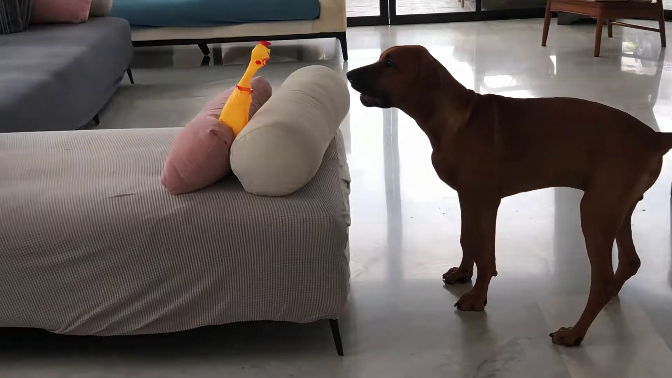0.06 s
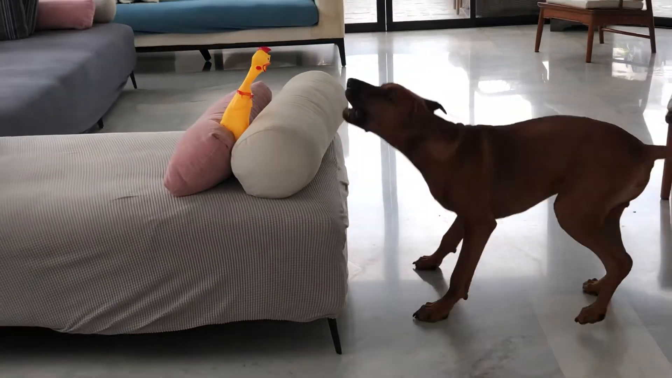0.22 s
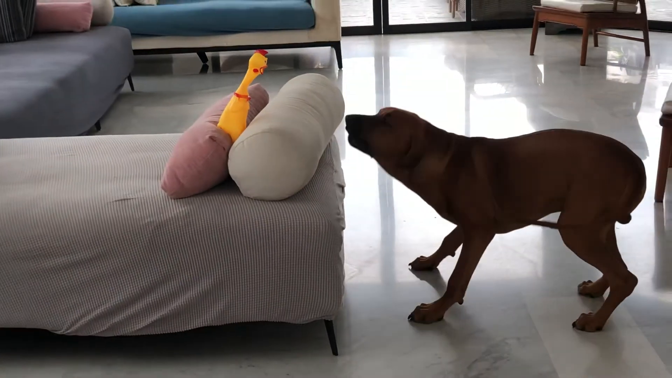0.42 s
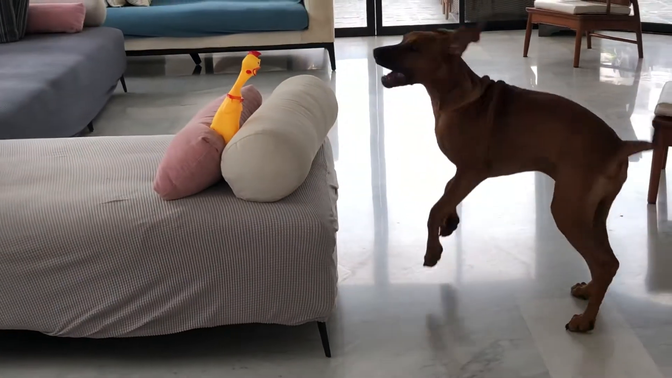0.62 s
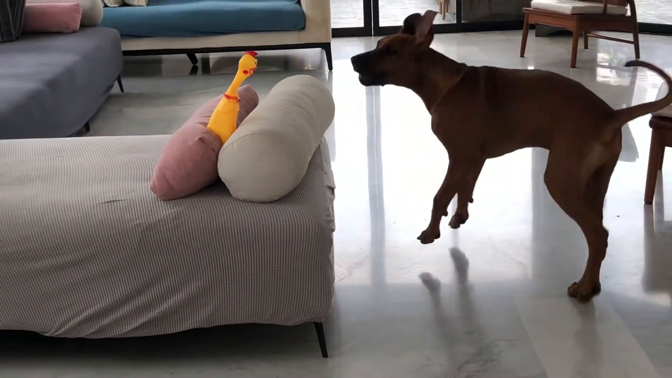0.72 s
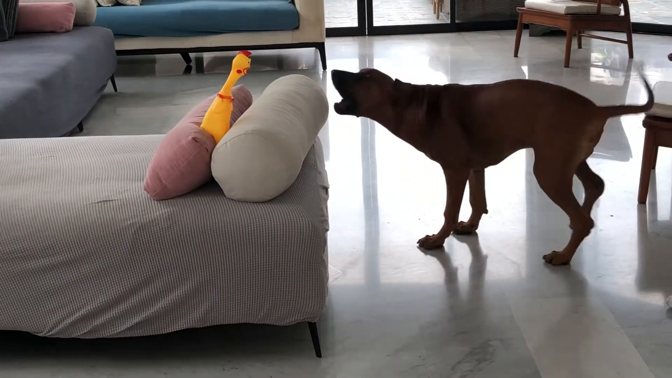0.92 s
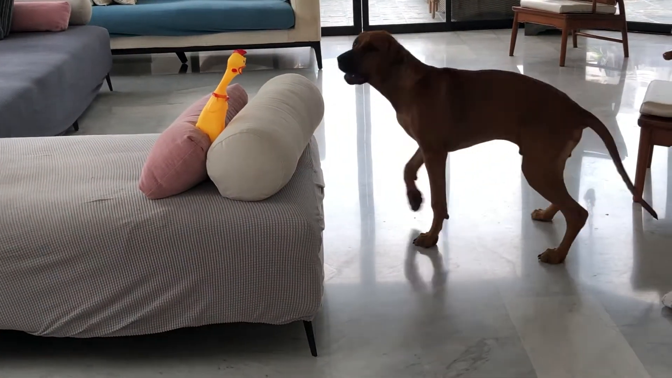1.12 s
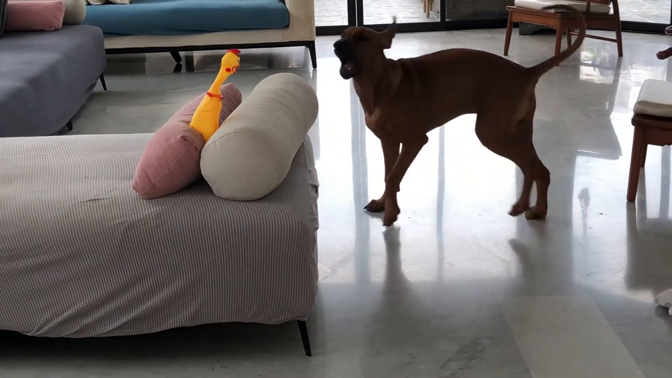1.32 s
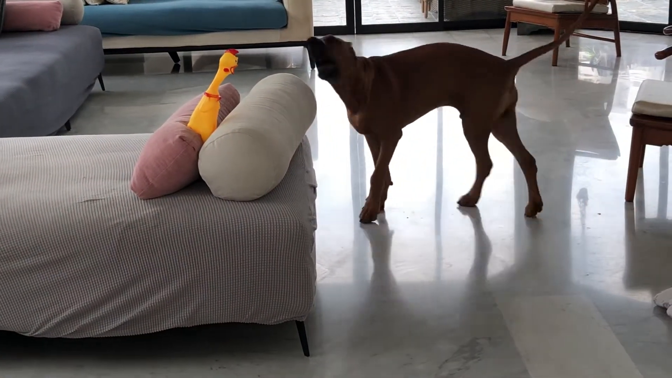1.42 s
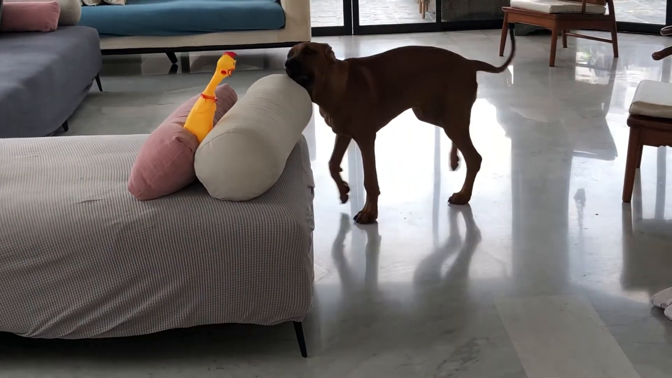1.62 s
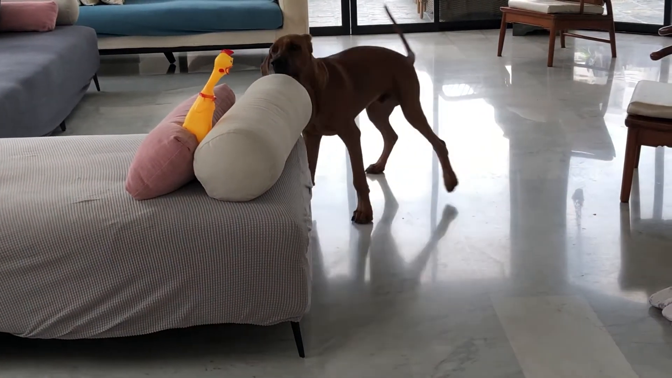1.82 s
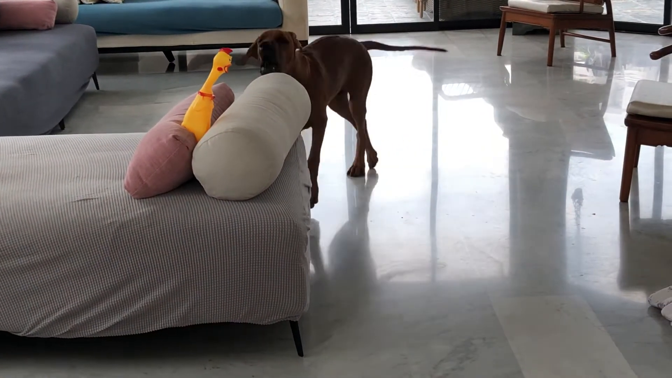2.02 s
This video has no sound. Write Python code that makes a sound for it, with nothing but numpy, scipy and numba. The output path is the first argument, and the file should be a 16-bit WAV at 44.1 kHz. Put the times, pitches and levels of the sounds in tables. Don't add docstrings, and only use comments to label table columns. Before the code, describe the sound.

Low, quiet room hum and tiny claw ticks on a stone floor at 0.15 s, then a large dog barks loudly at 0.2, 0.85 and 1.4 s. Each bark lasts about 0.2 s, hoarse and breathy, rising in pitch, the last rougher and more broken. Faint claws tick between them and soft paws thud near 1.0 and 1.55 s. The hard living room rings about a second; the phone compresses the peaks.

```python
import sys
import numpy as np
from scipy import signal
from scipy.fft import rfft, irfft, next_fast_len
from scipy.io import wavfile
from scipy.ndimage import map_coordinates
from numba import njit

SR = 44100
rng = np.random.default_rng(int(sys.argv[2]) if len(sys.argv) > 2 else 0)


def store_pcm(level_fs):
    pcm = np.round(np.clip(level_fs, -1, 1) * 32767).astype(np.int16)
    wavfile.write(sys.argv[1], SR, np.atleast_2d(pcm).T)


def convert_level_to_amplitude(level_db):
    exponent = np.asarray(level_db, float) / 20
    return 10 ** exponent


N = 90405


def level(x, db):
    return x * convert_level_to_amplitude(db) / np.sqrt(np.mean(x ** 2))


@njit
def svf(x, hz, width_hz):
    y, band_state, low_state = np.empty(len(x)), 0., 0.
    for i in range(len(x)):
        g, k = np.tan(np.pi * hz[i] / SR), width_hz / hz[i]
        v = (band_state + g * (x[i] - low_state)) / (1 + g * (g + k))
        band_state = 2 * v - band_state
        low_state += 2 * g * v
        y[i] = k * v
    return y


@njit
def follow(x, rise, fall):
    y, e = np.empty(len(x)), 1e-4
    for i in range(len(x)):
        e += (x[i] - e) * (rise if x[i] > e else fall)
        y[i] = e
    return y


def resonate(x, hz, width_hz):
    hz = hz + np.zeros(len(x))
    once = svf(x, hz, 1. * width_hz)
    return svf(once, hz, 1. * width_hz)


def wobble(n, rate_hz):
    w = map_coordinates(rng.standard_normal(n), [np.arange(n) * rate_hz / SR], order=1)
    return w / w.std()


def coloured_octaves(n, points):
    f = np.maximum(np.fft.rfftfreq(n, 1 / SR), 1)
    point_hz, point_db = np.array(points).T
    spectrum = rfft(rng.standard_normal(n)) * convert_level_to_amplitude(np.interp(np.log(f), np.log(point_hz), point_db))
    octaves = []
    for centre in 32 * 2. ** np.arange(10):
        weight = np.clip(1 - np.abs(np.log2(f / centre)), 0, 1)
        octaves.append((centre, irfft(spectrum * weight, n)))
    return octaves


# (frequency [Hz], density [dB per Hz])
HUM_SPECTRUM = [(30, -35.5), (70, -10), (190, -7.5), (300, -9), (700, -16.5), (2000, -26), (5000, -37),
                (14000, -63)]
HUM_DB, HUM_FLICKER_DB, HUM_FADE_DB_S = -43.5, 2, 1.5


def air():
    octaves = coloured_octaves(next_fast_len(N), HUM_SPECTRUM)
    hum = sum(convert_level_to_amplitude(HUM_FLICKER_DB * wobble(N, 6.3)) * b[:N] for _, b in octaves)
    return level(hum, HUM_DB) * convert_level_to_amplitude(-HUM_FADE_DB_S * np.arange(N) / SR)


# (frequency [Hz], T60 [s])
ROOM_T60 = [(125, 0.44), (400, 0.69), (1000, 0.82), (2500, 0.89), (6000, 0.74), (14000, 0.36)]
# (frequency [Hz], density [dB per Hz])
ROOM_COLOUR = [(100, 1.5), (400, 7.5), (1000, 1), (3000, -3), (8000, 2), (16000, 1.5)]
# (frequency [Hz], T60 [s], level at bark 1 [dB], bark 2 [dB], bark 3 [dB])
ROOM_RINGS = [(357, .9, -7, -14, -14), (430, 1.15, -1, -7, -8), (512, 1., -16, -8, -8),
              (720, .9, -9, -12, -10), (791, 1.6, -18, -14, 0), (836, 1.2, -16, -3, -10)]
ROOM_DB, RINGS_DB = 0, -17
FIRST_ECHO_S, BUILD_S = 0.0032, 0.007
ROOM_LEN = 65536


def room(x, spot):
    t = np.arange(ROOM_LEN) / SR
    t60_hz, t60_s = np.array(ROOM_T60).T
    tail = np.zeros(ROOM_LEN)
    for hz, b in coloured_octaves(ROOM_LEN, ROOM_COLOUR):
        tail += b * convert_level_to_amplitude(-60 * t / np.interp(np.log(hz), np.log(t60_hz), t60_s))
    rings = np.zeros(ROOM_LEN)
    for hz, ring_s, *db in ROOM_RINGS:
        rings += convert_level_to_amplitude(db[spot] - 60 * t / ring_s) * np.sin(2 * np.pi * hz * t)
    build = 1 - np.exp(-np.maximum(t - FIRST_ECHO_S, 0) / BUILD_S)
    tail = (tail / tail[:8192].std() + convert_level_to_amplitude(RINGS_DB) * rings) * build
    tail /= np.sqrt(np.sum(tail ** 2))
    return x + convert_level_to_amplitude(ROOM_DB) * signal.fftconvolve(x, tail)[:N]


# (time [s], peak level [dB], frequency [Hz], width [Hz], ring to -30 dB [s])
STEPS = [(.143, -46.5, 12400, 9100, 0.0061), (.151, -39.5, 6260, 5000, 0.0081),
         (.157, -36, 5500, 5000, 0.022), (0.167, -29, 730, 260, .04), (.527, -49, 10200, 9030, 0.014),
         (0.562, -40.5, 9274, 9100, 0.053), (0.607, -48, 9950, 8980, 0.029),
         (0.823, -47, 7500, 8280, 0.089), (1.019, -29, 222, 59, 0.067), (1.567, -34.5, 90, 50.5, 0.067),
         (1.548, -30.5, 252, 90, 0.31)]
STEP_LEN, STEP_RISE_S = 8192, 0.0038


def paws():
    out, t = np.zeros(N), np.arange(STEP_LEN) / SR
    for start_s, db, hz, width_hz, ring_s in STEPS:
        decay = convert_level_to_amplitude(-30 * t / ring_s) * np.minimum(t / STEP_RISE_S, 1)
        tick = resonate(rng.standard_normal(STEP_LEN) * decay, hz, width_hz)
        out[int(start_s * SR):][:STEP_LEN] += convert_level_to_amplitude(db) * tick / np.abs(tick).max()
    return out


# (frequency [Hz], width [Hz], level [dB])
UPPER = [(3260, 630, -5.5), (3980, 650, -6), (4870, 1780, -7), (6480, 2550, -10.5), (9180, 3500, -18.5),
         (12470, 13000, -20.5)]
BARK_LEN = 13000
VOICE_DB, BREATH_DB = -14.5, 11
JITTER, SHIMMER_DB = .075, 7
HISS_POWER, GUST_DB = 1.8, 3
JAW_SHIFT, JAW_DB_PER_OCT = 0.31, 6


def bark(rows, throat, half_db):
    rows = np.array(rows).T
    t = rows[0, 0] + np.arange(BARK_LEN) / SR
    pitch_hz, loud_db, rough, jaw = (np.interp(t, rows[0], col) for col in rows[1:])
    rough = np.clip(rough, 0, 1)
    shut = 1 - np.clip(jaw, 0, 1)

    jitter = 1 + JITTER * rough * wobble(BARK_LEN, 180.1)
    phase = 2 * np.pi * np.cumsum(pitch_hz * jitter) / SR
    folds = sum(np.cos(k * phase + k * k) for k in range(1, 9))
    folds = folds * convert_level_to_amplitude(SHIMMER_DB * rough * wobble(BARK_LEN, 115.4))
    folds = folds * (1 + 2 * convert_level_to_amplitude(half_db) * np.cos(phase / 2))

    breath = rng.standard_normal(BARK_LEN) * (1 + .5 * np.cos(phase))
    push = convert_level_to_amplitude(loud_db + VOICE_DB) * (t < rows[0, -1])
    voice = (folds + convert_level_to_amplitude(BREATH_DB) * rough * breath) * push
    hiss = breath * push * convert_level_to_amplitude((HISS_POWER - 1) * loud_db + GUST_DB * wobble(BARK_LEN, 45.8))

    def jaw_db(hz):
        return -JAW_DB_PER_OCT * shut * np.log2(min(hz, 3000) / 420)

    low, high = np.zeros(BARK_LEN), np.zeros(BARK_LEN)
    for k, (hz, width_hz, db) in enumerate(throat):
        moving_hz = hz * (1 - JAW_SHIFT * shut * (k > 0))
        low += (-1) ** k * convert_level_to_amplitude(db + jaw_db(hz)) * resonate(voice, moving_hz, width_hz)
    for k, (hz, width_hz, db) in enumerate(UPPER):
        high += (-1) ** k * convert_level_to_amplitude(db + jaw_db(hz)) * resonate(hiss, hz, width_hz)
    return 2 * low + high


# (time [s], pitch [Hz], level [dB], roughness [0-1], jaw opening [0-1])
BARKS = [
    [(.195, 286, -47, 0.4, .9), (.201, 295.6, -15.5, .6, 1.), (.235, 340.3, 0.5, 0.31, 1.),
     (.26, 387.2, 1, 0.35, 0.86), (.31, 395.7, -3, 0.59, 0.59), (.36, 419.3, -1.5, 0.31, 0.17),
     (.39, 427.5, -6.5, 0, .1), (.42, 400, -44, .3, 0.)],
    [(.848, 298.7, -27, 0.49, 1), (.872, 315.4, -4.5, 0.33, 0.88), (.893, 362, 2, 0.2, 0.82),
     (.925, 406.7, -8, 0.45, 0.65), (.98, 416.1, -6, 0.37, 0.74), (1.03, 423.5, -5.5, 0.48, 0.71),
     (1.07, 412.3, -14.5, 0.4, 0), (1.10, 404, -58, .3, 0.54)],
    [(1.422, 289.2, -30, 0.83, 1), (1.436, 298.5, -14.5, 0.42, 0.95), (1.475, 346.2, -2, 0.37, 0.91),
     (1.50, 364.7, -3.5, 0.31, 0.75), (1.535, 397.5, 2, 0.48, 0.31), (1.565, 407.7, -13.5, 0.21, 0),
     (1.60, 395.3, -7.5, 0.31, 0.59), (1.63, 385, -87, 0.1, 0.2)],
]
# (frequency [Hz], width [Hz], level [dB])
THROATS = [
    [(353, 384, -5), (734, 344, 3.5), (1242, 294, -2), (2016, 387, -6.5)],
    [(492, 181, -0.5), (898, 407, -2), (1620, 264, 1), (2222, 317, -7.5)],
    [(491, 143, 5.5), (824, 331, 0), (1544, 240, -3.5), (2178, 240, -3)],
]
HALF_DB = [-20, -11, -13]


def dog():
    out = np.zeros((len(BARKS), N))
    for spot, (rows, throat, half_db) in enumerate(zip(BARKS, THROATS, HALF_DB)):
        out[spot, int(rows[0][0] * SR):][:BARK_LEN] = bark(rows, throat, half_db)
    return out


def scene():
    barks = sum(room(b, spot) for spot, b in enumerate(dog()))
    return (air() + room(paws(), 0) + barks)[None]


def low_pass(x):
    return signal.sosfilt(signal.butter(12, 16050, fs=SR, output="sos"), x)


MIC_LOW_HZ = 39.5
GAIN_TOP_DB, GAIN_RATIO, ATTACK_S, RELEASE_S = -3.5, 4, 0.0017, 0.052
CEILING, KNEE = .95, 6


def record(dry):
    x = signal.sosfilt(signal.butter(1, MIC_LOW_HZ, "high", fs=SR, output="sos"), dry)
    envelope = follow(np.abs(x[0]), 1 / (ATTACK_S * SR), 1 / (RELEASE_S * SR))
    gain = np.minimum(1, convert_level_to_amplitude(GAIN_TOP_DB) / envelope) ** (1 - 1 / GAIN_RATIO)
    x = x * gain / CEILING
    mix = CEILING * x / (1 + x ** KNEE) ** (1 / KNEE)
    return low_pass(mix)


dry = scene()
out = record(dry)
store_pcm(out)
```